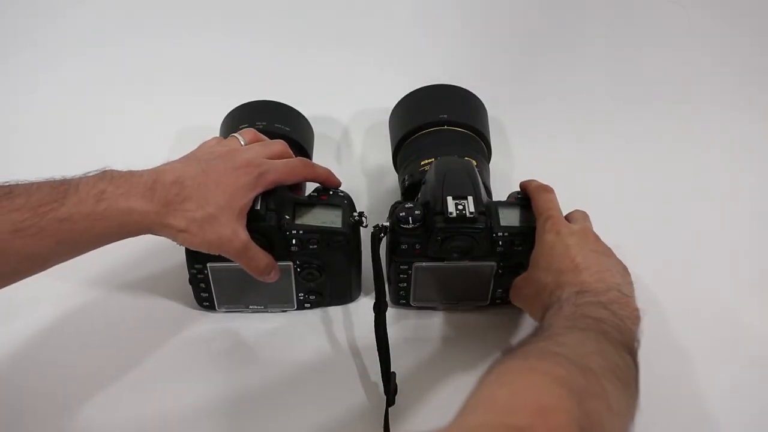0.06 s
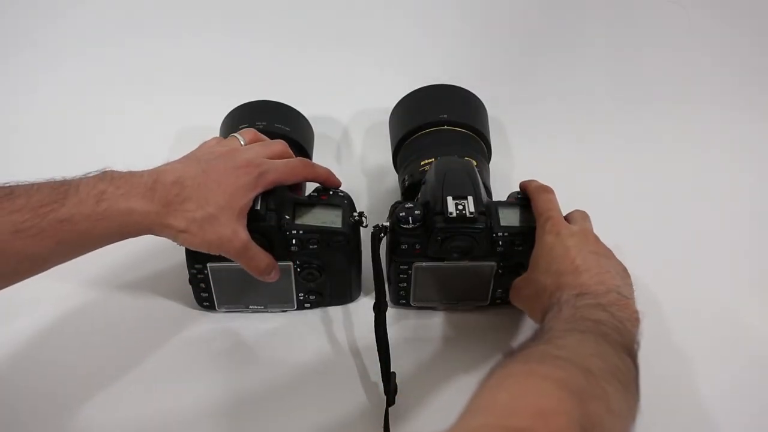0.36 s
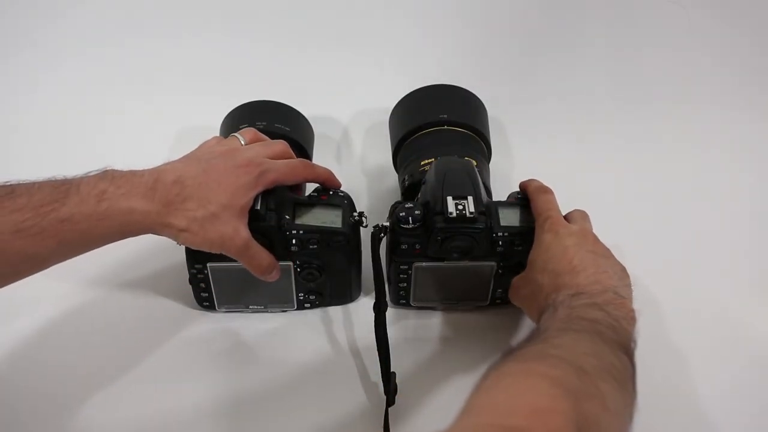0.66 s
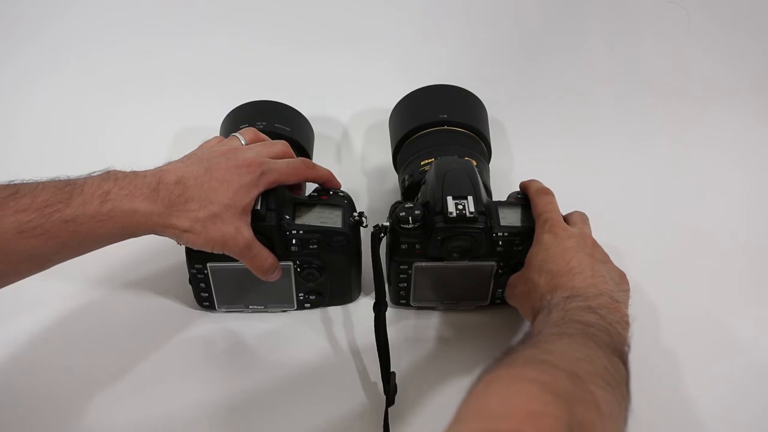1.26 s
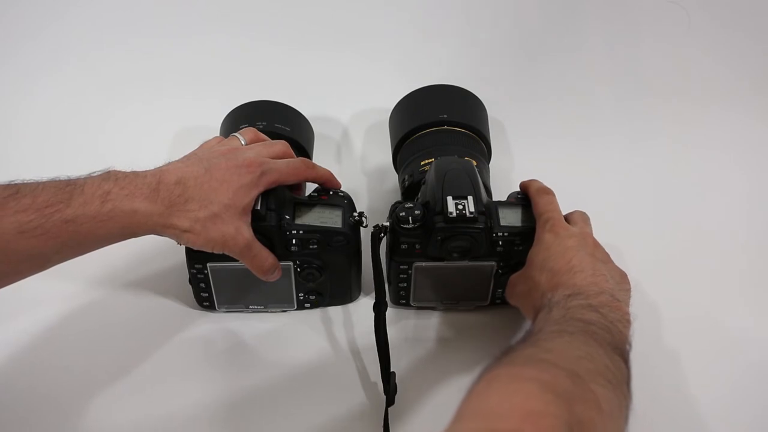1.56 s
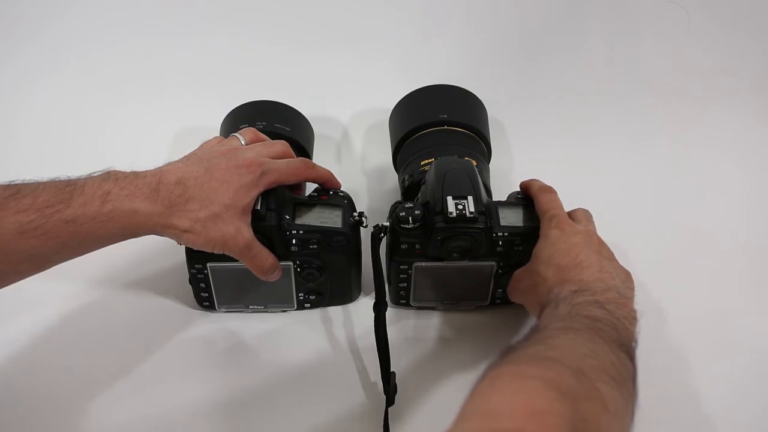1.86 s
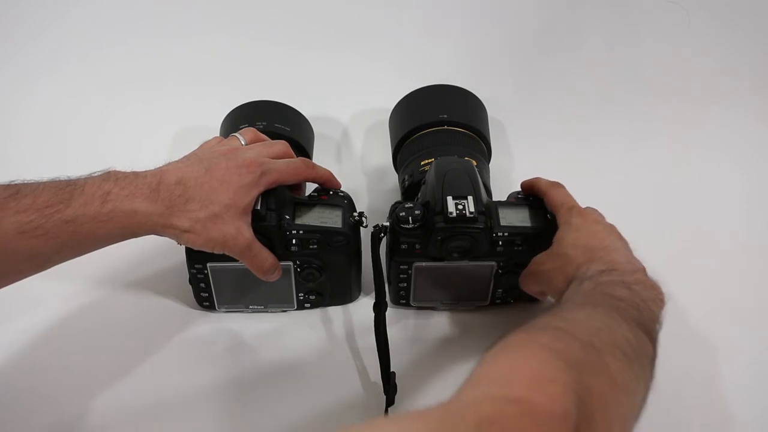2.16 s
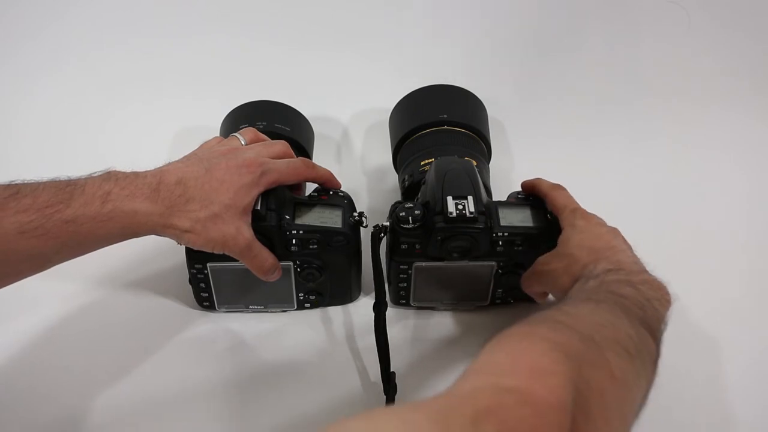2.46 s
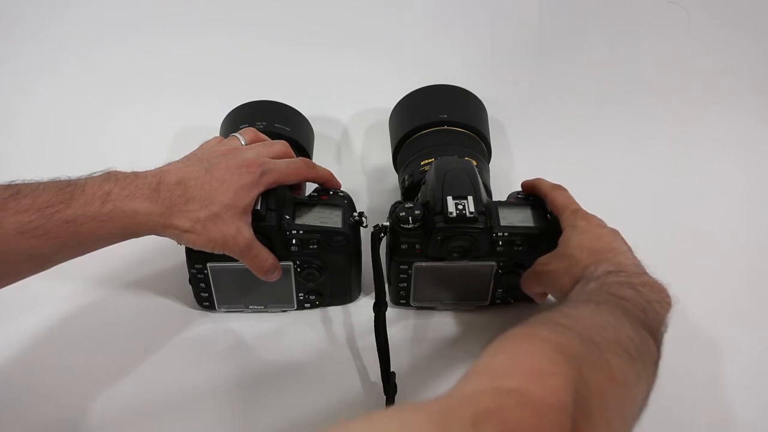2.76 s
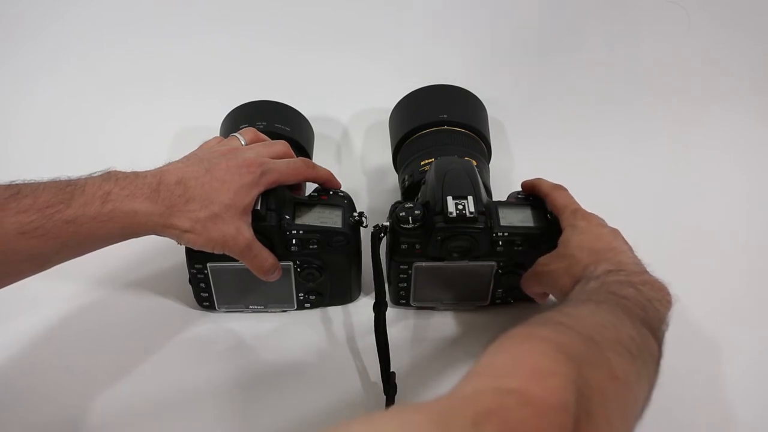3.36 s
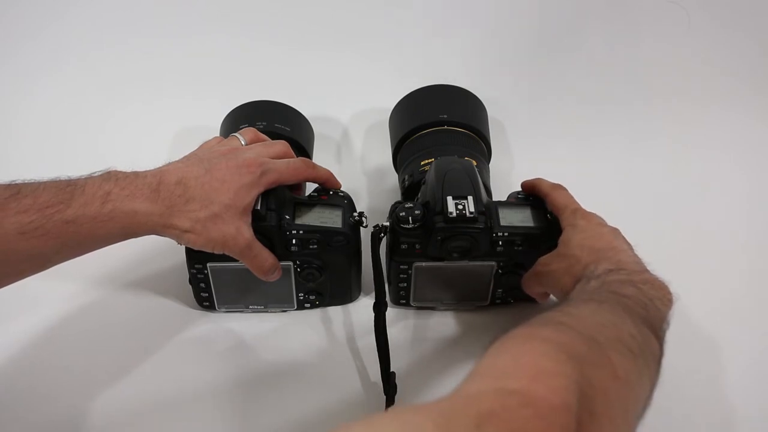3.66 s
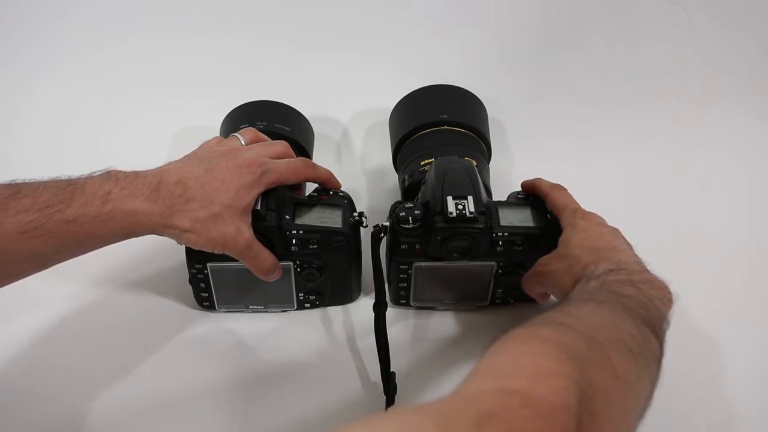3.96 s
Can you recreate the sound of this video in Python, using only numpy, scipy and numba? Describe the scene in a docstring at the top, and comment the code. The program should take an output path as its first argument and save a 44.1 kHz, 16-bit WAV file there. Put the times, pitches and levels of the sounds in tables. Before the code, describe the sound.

Rapid shutter clicks from two cameras shooting continuously, drifting in and out of step.

```python
"""Two reflex cameras on a table fire bursts at five and four frames a second, drifting in and out of step.
Each frame is a quick chain of blows: mirror up, shutter curtains, mirror down and bounce.
Each blow is a noise crack plus two short rings. Housings, table and a small room ring on, over
ventilation rumble and a low hum. The recorder's gain control turns down once the bursts start."""
import sys
import numpy as np
from scipy import signal
from scipy.fft import rfft, irfft
from scipy.io import wavfile
from numba import njit

SR = 44100
rng = np.random.default_rng(int(sys.argv[2]) if len(sys.argv) > 2 else 0)


def waveform_to_disk(signal):
    """Save audio, clipped to [-1, 1], as 16-bit WAV at the path in sys.argv[1]."""
    frames = np.transpose(np.atleast_2d(signal))
    scaled = np.clip(frames, -1, 1) * 32767
    samples = np.round(scaled).astype(np.int16)
    wavfile.write(sys.argv[1], SR, samples)


N = 176400
BANDS_HZ = 25 * 2 ** np.arange(0, 9.6, 1 / 3)


def undb(db):
    """Decibels to gain."""
    return 10 ** (np.asarray(db) / 20)


def unit(x):
    """Scale each row to unit energy."""
    return x / np.sqrt(np.sum(x ** 2, axis=-1, keepdims=True))


def per_band(table, column=1):
    """One column of a frequency table, interpolated at every band."""
    points = np.array(table, float)
    return np.interp(np.log(BANDS_HZ), np.log(points[:, 0]), points[:, column])


def band_noise(size):
    """White noise split into third-octave rows."""
    octave = np.log2(np.maximum(np.arange(size // 2 + 1) * SR / size, 1))
    masks = np.array([np.interp(octave, np.log2(BANDS_HZ), row) for row in np.eye(len(BANDS_HZ))])
    white = rng.standard_normal((len(BANDS_HZ), size))
    return irfft(rfft(white) * np.sqrt(masks + 1e-12), size)


def fade(t, decay_s, attack_s):
    """Quick rise, exponential fall."""
    return (1 - np.exp(-t / attack_s)) * np.exp(-t / decay_s)


def add(out, start_s, x):
    """Mix x into out at start_s."""
    i = int(start_s * SR)
    out[i:i + len(x)] += x[:max(len(out) - i, 0)]


@njit
def follow(x, attack_s, release_s):
    """One-pole level follower."""
    out, level = np.empty(len(x)), 0.
    for i in range(len(x)):
        lag_s = attack_s if abs(x[i]) > level else release_s
        level += (abs(x[i]) - level) / (lag_s * SR)
        out[i] = level
    return out


def room_tone():
    """Soft ventilation rumble and a steady hum."""
    # ventilation spectrum: freq_hz, density_db
    spectrum = [(25, -34), (45, -17), (90, -20), (150, 0.5), (210, -7.5), (400, -8.5), (800, -14.5),
                (1600, -21.5), (3200, -30), (8000, -33.5), (13000, -37.5), (16000, -55)]
    # hum partials: pitch_hz, rms_db
    partials = [(59.2, -58.5), (146, -56)]
    t = np.arange(N) / SR
    weights = unit(undb(per_band(spectrum)) * np.sqrt(BANDS_HZ))
    air = weights @ unit(band_noise(N)) * np.sqrt(N)
    hum = sum(np.sqrt(2) * undb(db) * np.sin(2 * np.pi * hz * t) for hz, db in partials)
    return undb(-46.5) * air + hum


def room(x, size=32768):
    """Direct sound, housing and table rings, two near reflections, diffuse tail."""
    # room reverberation: freq_hz, gain_db, t60_s
    reverb = [(103, -4, 0.6), (325, 0.5, 0.49), (1080, -3.5, 0.42), (1590, -4.5, 0.42), (3300, -4, 0.41),
              (5100, -4, 0.35), (7850, -6.5, 0.32), (15000, -7.5, 0.21)]
    # housing and table modes: pitch_hz, gain_db, t60_s
    modes = [(150, 0, .5), (300, -3, .4), (339, 6, .28), (1012, 6, .33), (1065, -1, .22), (1295, -7, .35),
             (1488, -8, .18), (2724, -2, .22), (4624, -10, .12), (4899, -10, .12)]
    # reflections off near surfaces: delay_s, gain_db
    echoes = [(0.0114, -27), (0.027, -22.5)]
    t = np.arange(size) / SR
    tail_decay_s = per_band(reverb, column=2)[:, None] / np.log(1000)
    weights = undb(per_band(reverb)) * np.sqrt(2 * np.gradient(BANDS_HZ) / SR)
    response = weights @ unit(band_noise(size) * fade(t, tail_decay_s, attack_s=.0035))
    for hz, db, t60_s in modes:
        decay_s = t60_s / np.log(1000)
        response += undb(db) * 2 / (decay_s * SR) * np.cos(2 * np.pi * hz * t) * np.exp(-t / decay_s)
    for delay_s, db in [(0, .032)] + echoes:
        response[int(delay_s * SR)] += undb(db)
    return signal.fftconvolve(x, response)[:N]


def camera(starts_s, blows, colour, size=2048):
    """Mirror and shutter blows: a crack, a body ring and a metal ring each, nearly alike every frame."""
    attack_s, body_decay_s, metal_decay_s = .00021, .0036, .0017
    jitter_s, scatter_db, detune, fresh_ratio = .00016, .7, .017, .93  # frame-to-frame variation
    bass_hang_hz = 970  # cracks die more slowly below this
    out, t = np.zeros(N), np.arange(size) / SR
    frame_noises = np.array([band_noise(size) for _ in starts_s])
    for offset_s, crack_db, base_decay_ms, tilt_db_per_oct, body_hz, body_db, metal_hz, metal_db in blows:
        density_db = per_band(colour) + tilt_db_per_oct * np.log2(BANDS_HZ)
        weights = undb(crack_db) * unit(undb(density_db) * np.sqrt(BANDS_HZ))
        crack_decay_s = base_decay_ms / 1000 * (1 + bass_hang_hz / BANDS_HZ[:, None])
        envelope = fade(t, crack_decay_s, attack_s)
        repeated = weights @ unit(band_noise(size) * envelope)
        modes = [(body_hz, body_db, body_decay_s, rng.random()),
                 (metal_hz, metal_db, metal_decay_s, rng.random())]
        noises = rng.permutation(frame_noises)
        deviations = rng.standard_normal((len(starts_s), 3))
        for start_s, noise, (late, force, shift) in zip(starts_s, noises, deviations):
            fresh = weights @ unit(noise * envelope)
            blow = (repeated + fresh_ratio * fresh) / np.hypot(1, fresh_ratio)
            for hz, db, decay_s, phase in modes:
                ring = np.sin(2 * np.pi * (hz * (1 + detune * shift) * t + phase))
                blow += undb(db) * unit(ring * fade(t, decay_s, attack_s))
            add(out, start_s + offset_s + jitter_s * late, undb(scatter_db * force) * blow)
    return out


def fast_camera():
    """Five frames a second: mirror swings up to its stop, two curtains run, mirror drops and settles."""
    # blows of one frame:
    # offset_s, crack_db, base_decay_ms, tilt_db_per_oct, body_hz, body_db, metal_hz, metal_db
    blows = [ (.0002, 0, 6.6, 0, 1330, -27, 2870, -3.5), (.0043, 5, 2.36, -1.5, 1386, -3.5, 4895, 1.5),
             (.0098, -3.5, 0.79, -0.5, 1220, -6.5, 2640, -5.5),
             (.0249, 1.5, 2.16, -3.5, 1072, -2.5, 2690, -9.5),
             (0.0274, -22, 0.67, 16.5, 1470, -3, 4470, -28), (.0356, 0.5, 2.0, -2, 1680, -10, 2850, -9),
             (.0396, 6.5, 0.88, 1, 1018, -4, 6450, -1), (0.0421, -2.5, 4.0, -1.5, 1540, -12.5, 1180, -4),
             (.0747, 1, 1.1, 3.5, 1310, -21, 4700, -4), (.0792, 3.5, 5.1, 1.5, 778, -9, 2680, -4.5),
             (.1210, -4.5, 10, 0, 1230, -10, 5130, -13.5), ]
    # crack spectrum: freq_hz, density_db
    colour = [(100, -14), (230, -14), (350, -2), (620, -11), (1100, 0), (2100, -1.5), (4500, 4.5),
              (7000, 0), (11000, -3), (16000, -21)]
    start_s, period_s, frames = .684, .19622, 17
    return camera(start_s + period_s * np.arange(frames), blows, colour)


def slow_camera():
    """Four frames a second: mirror hits its stop, two curtains run, mirror drops, bounces and settles."""
    # blows of one frame:
    # offset_s, crack_db, base_decay_ms, tilt_db_per_oct, body_hz, body_db, metal_hz, metal_db
    blows = [ (-.0016, -5, 2.8, -2.5, 1570, -14.5, 3550, -32), (.0042, 1, 1.8, 1.5, 1610, 1.5, 3240, -5.5),
             (0.0186, 3.5, 0.95, 0.74, 1100, -6, 3784, 3), (0.0224, -3.5, 3, -1.8, 1470, -0.5, 3040, 1.5),
             (0.0343, -15, 0.4, 0.62, 2110, -1, 6556, 2.5), (.0374, -10.5, 1.0, -0.35, 855, -8, 7200, -2.5),
             (0.0391, 1.5, 2, .8, 1424, -6, 3090, 2.5), (.0675, 0, 5.8, 2.1, 648, -18, 2800, -6),
             (.0711, -3.5, 4.6, 0, 1491, 4.5, 1830, 3), (0.0755, -5.5, 2.9, -2, 1435, -11, 2570, -8),
             (0.0808, -6, 0.9, 2.3, 1600, -26, 6200, -6), (0.113, -8.5, 2.6, 0.63, 1730, -25, 3340, -8), ]
    # crack spectrum: freq_hz, density_db
    colour = [(100, -8), (230, -12.5), (350, -6.5), (620, -8), (1100, 0.5), (2100, 1), (4500, -2),
              (7000, -4.5), (11000, -3.5), (16000, -24.5)]
    start_s, period_s, frames = .8176, .24695, 13
    return camera(start_s + period_s * np.arange(frames), blows, colour)


def scene():
    """Both cameras in the room, slowly growing louder."""
    radiation_hz, swell_db_per_s = 125, 1.5
    clacks = undb(5.5) * fast_camera() + undb(5) * slow_camera()
    # small housings radiate little bass
    radiated = signal.sosfilt(signal.butter(4, radiation_hz, "high", fs=SR, output="sos"), clacks)
    swell = undb(swell_db_per_s * (np.arange(N) - N / 2) / SR)
    return (room(swell * radiated) + room_tone())[None]


def record(dry):
    """Slow gain control, rounded peaks, treble cut-off."""
    threshold_db, slope, ceiling, cutoff_hz = -26, .57, 1.2, 15900
    level = follow(dry[0], attack_s=.033, release_s=.49)
    gain = np.maximum(level / undb(threshold_db), 1) ** -slope
    rounded = ceiling * np.tanh(dry * gain / ceiling)
    return signal.sosfilt(signal.ellip(8, .2, 70, cutoff_hz, fs=SR, output="sos"), rounded)


dry = scene()
out = record(dry)
waveform_to_disk(out)
```